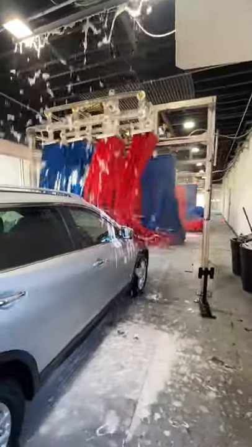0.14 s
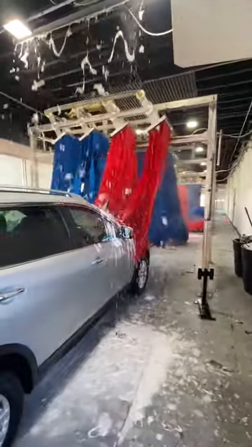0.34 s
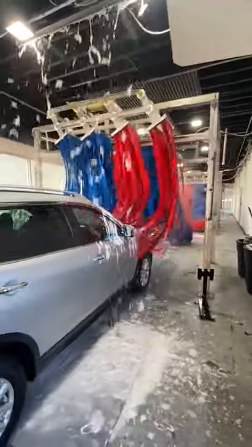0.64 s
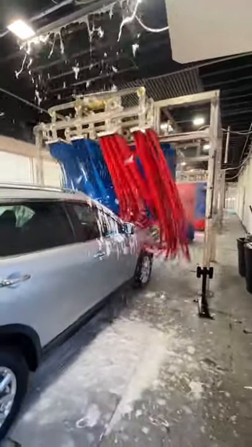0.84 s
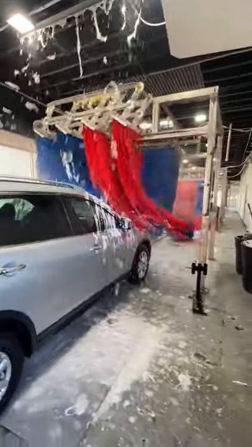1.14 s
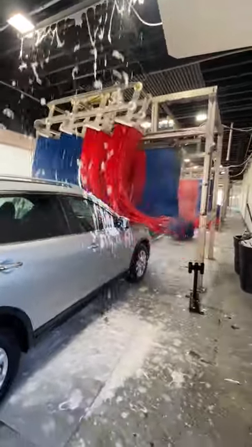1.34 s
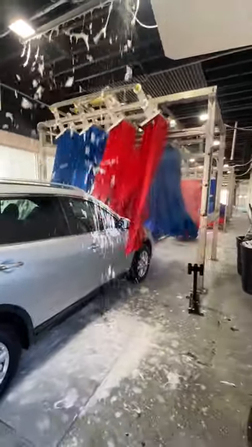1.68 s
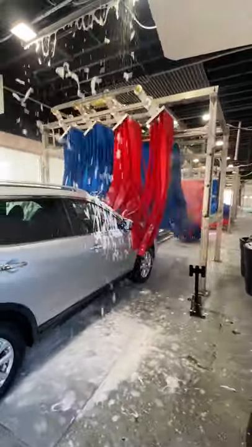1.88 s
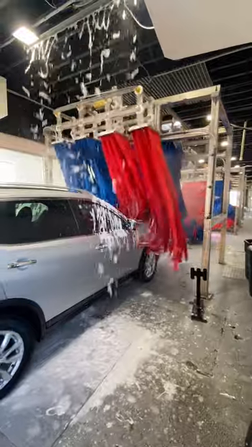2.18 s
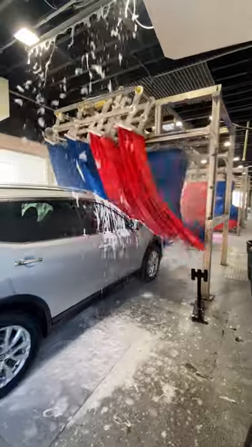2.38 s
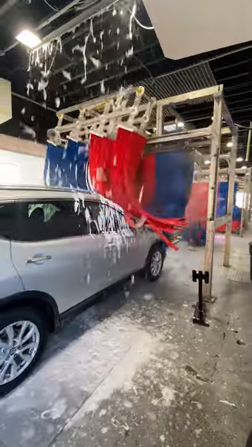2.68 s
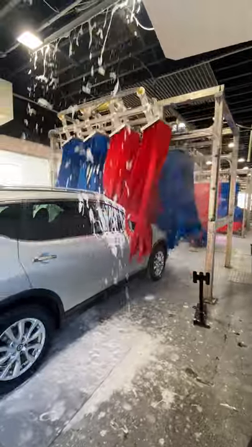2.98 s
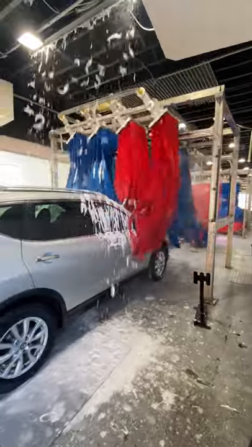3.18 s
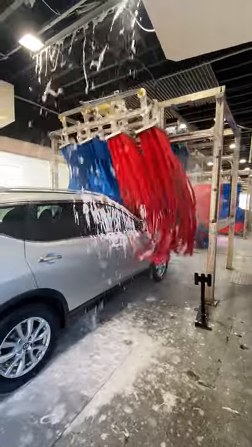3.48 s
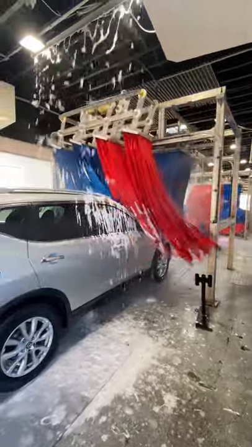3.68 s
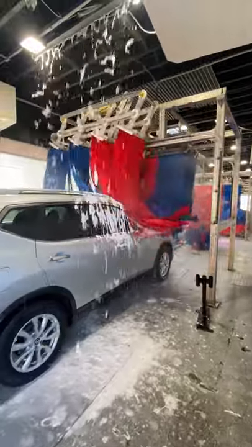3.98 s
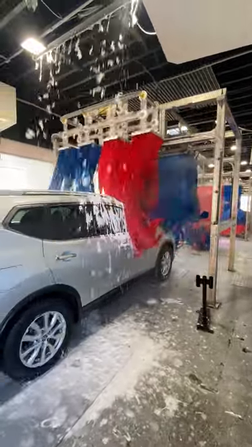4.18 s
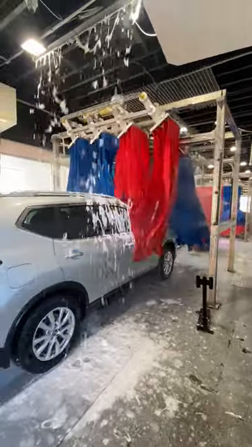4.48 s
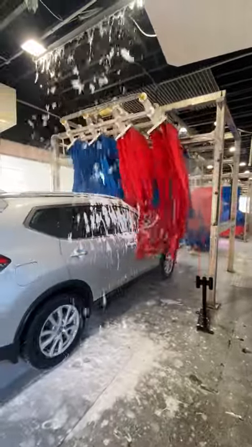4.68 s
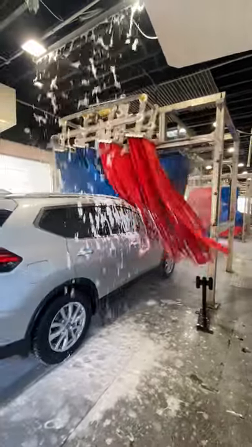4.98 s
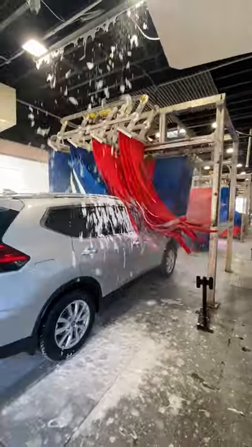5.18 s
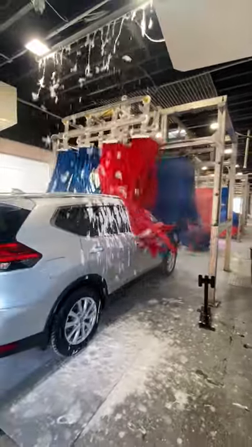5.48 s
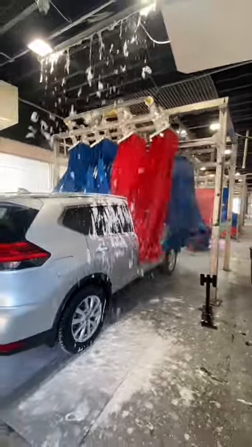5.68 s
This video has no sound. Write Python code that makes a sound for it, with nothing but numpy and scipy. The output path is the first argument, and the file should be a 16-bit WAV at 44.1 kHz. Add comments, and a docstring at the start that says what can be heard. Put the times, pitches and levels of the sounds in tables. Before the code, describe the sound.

Wet curtains rub continuously over a car, breaking into irregular slaps, some dull and some sharp, with soft hollow thumps underneath. Spray hisses strongly at the start, giving way to light showers and drips. Foam bursts crisply on the floor nearby. A low motor groan swells late over steady machine roar. A phone in the hard, long hall picks it up in stereo, with further taps more distant.

```python
"""Inside a tunnel car wash, beside a car: wet cloth swishes over the bodywork and slaps it, brushes drum.
Slaps ring as short resonances; swish, drumming and spray are crowds of tiny random impacts, filtered.
A jet of spray hisses close by at first. Blobs of foam drop from an overhead bar and burst on the concrete
as clicks and noise. A frame knocks once, and pumps and motors drone as filtered noise and wavering tones.
All is heard through the two ports of a phone, in a hard, long hall."""
import sys
import numpy as np
from scipy import signal
from scipy.fft import rfft, irfft
from scipy.io import wavfile
from scipy.ndimage import uniform_filter1d, map_coordinates

SR = 44100
rng = np.random.default_rng(int(sys.argv[2]) if len(sys.argv) > 2 else 0)


def store_wav(level_fs):
    """Save 16-bit WAV to argv[1]."""
    pcm = np.round(np.clip(np.atleast_2d(level_fs), -1, 1) * 32767)
    wavfile.write(sys.argv[1], SR, pcm.T.astype(np.int16))


N = 257103
TIME = np.arange(N) / SR  # seconds
FREQ = np.maximum(np.fft.rfftfreq(N, 1 / SR), 1)  # Hz

# How a soft and a sharp tip sound. Each row: snap relative to the thud in dB, centre of the snap in Hz,
# width of the thud as a share of its own centre.
SOFT_TIP, SHARP_TIP = (-18, 1730, 0.25), (2.3, 3920, 1.2)
# Cloth striking the car. Each row: start in seconds, peak of the thud in dB, centre of the thud in Hz,
# snap of the tip relative to the thud in dB, level of the flurry after it in dB, length of the flurry in seconds.
CLOTH_SLAPS = [(.105, -15.5, 1200, -14, -31, 0.025), (.187, -16, 920, -24, -32, 0.019),
               (.245, -14, 1500, -3, -23.5, .018), (.283, -19.5, 267, -20, -27.5, 0.037),
               (.856, -14.5, 1500, -10, -35, .008), (1.243, -18, 775, -13, -38, .015),
               (1.435, -24, 705, -22, -34, 0.011), (1.463, -20, 734, -18, -36, .02),
               (1.499, -18, 636, -18, -26, 0.028), (1.524, -12, 1350, -10, -29, .012),
               (1.53, -20, 590, -14, -28.5, 0.043), (1.61, -18, 1070, -12, -33, 0.02),
               (1.752, -22, 266, -22, -31.5, 0.026), (2.164, -18, 700, -11, -33, 0.016),
               (2.215, -23, 690, -20, -35, .02), (2.371, -15.5, 930, -22, -31, 0.013),
               (2.396, -21, 1360, -14, -29, .015), (2.4345, -20, 1570, -7, -27.5, 0.031),
               (2.537, -28, 900, -13, -38, .012), (2.588, -24, 1000, -10, -36, .012),
               (2.626, -20, 170, -26, -26, 0.022), (2.8, -16, 910, -13, -29, .016),
               (2.861, -14, 700, -7, -24.5, 0.0094), (2.874, -10.5, 1180, -7, -26, .018),
               (2.9465, -13, 905, 2, -27.5, 0.036), (3.312, -22, 645, -20, -41, 0.011),
               (3.5705, -14.5, 920, -8, -25.5, .007), (3.604, -16, 720, -9, -29, .012),
               (3.919, -20, 840, -20, -40, 0.0089), (3.931, -17, 148, -26, -25, 0.038),
               (4.18, -16.5, 900, -3, -30, .01), (4.216, -18, 500, -3, -30, 0.023),
               (4.24, -17.5, 228, -24, -31, 0.037), (4.298, -11.5, 1220, -3, -32, 0.011),
               (4.32, -19, 1290, -21, -31.5, 0.039), (4.49, -19, 1700, -12, -34, 0.041),
               (4.722, -14.5, 830, -24, -36, 0.0082), (4.756, -22, 930, -15, -35, .01),
               (4.784, -23, 1020, -21, -37, 0.023), (4.918, -26, 800, -21, -52, .01),
               (5.007, -22, 840, -12, -35, 0.014), (5.113, -15.5, 175, -26, -23, 0.062),
               (5.146, -19, 834, -16, -31, .045), (5.579, -13.5, 640, -9.5, -28.5, .03),
               (5.642, -17, 1130, -14, -31, .018), (5.714, -21, 760, -16, -30.5, 0.041)]


def slaps(snap_width, flurry_width, strip_rate):
    """The tip of a strip snaps on a damped panel, and its neighbours flap down after it in a flurry."""
    track, t = np.zeros(N), TIME[:SR // 5]
    tip_db, tip_hz, tip_width = np.transpose([SOFT_TIP, SHARP_TIP])
    tap = 1. * (t == 0)  # a single click sets the resonances ringing
    for start_s, db, thud_hz, snap_db, flurry_db, flurry_s in CLOTH_SLAPS:
        # a sharper snap sounds higher and shortens the thud
        snap_hz = np.interp(snap_db, tip_db, tip_hz)
        thud_width_hz = thud_hz * np.interp(snap_db, tip_db, tip_width)
        thud = resonate(tap, thud_hz, thud_width_hz)
        snap = resonate(tap, snap_hz, snap_width * snap_hz)
        blow = thud / abs(thud).max() + undb(snap_db) * snap / abs(snap).max()

        contacts = rattle(t, strip_rate) * np.exp(-(t / flurry_s) ** 3)
        flurry = resonate(contacts, thud_hz, flurry_width * thud_hz)
        flurry = flurry / np.sqrt(np.sum(flurry ** 2) / (flurry_s * SR))
        add(track, start_s, undb(db) * blow + undb(flurry_db) * flurry)
    return track + hall(track, wet_db=-10)


# Between strokes the cloth rubs on, harder once the car is well into the curtains.
RUB_EARLY_DB, RUB_DB, RUB_FROM_S, RUB_FULL_S = -32, -30, 1.3, 1.6
# The curtains swing to and fro, and rub hardest as they meet the car.
SWING_PERIOD_S, SWING_HITS_S, SWING_DB = 1.287, 0.16, 1
# The fade after a stroke lasts a fixed time plus a share of the stroke's length.
STROKE_ATTACK_S, STROKE_RELEASE_S, STROKE_RELEASE_SHARE = 0.0082, 0.028, 0.13
# The tone colour of the swish. Each row: frequency in Hz, relative strength in dB per Hz.
SWISH_SPECTRUM = [(100, -10), (350, -6.5), (700, 2.5), (1300, -1.5), (2200, -5.5), (3500, -11),
                  (5000, -12.5), (15500, -31.5)]
# A curtain drags over the car. Each row: start in seconds, length in seconds, level in dB before the
# overall swish level, brightness in dB (treble against the rest).
CURTAIN_STROKES = [(0, 0.047, -25.5, -2), (0.1, 0.09, -25.5, -2), (0.19, 0.06, -21.5, 0.5),
                   (0.246, 0.023, -21.5, -1), (0.282, 0.044, -24, -9), (1.443, 0.18, -26, 1),
                   (2.153, 0.069, -26, -2), (2.435, 0.023, -24.5, -3), (2.595, 0.038, -32.5, -4),
                   (2.864, 0.027, -20, 1.5), (2.946, 0.038, -23, 4), (3.328, .04, -29, 4),
                   (3.596, 0.049, -28, -3), (3.802, 0.02, -29, 0), (4.282, 0.16, -39, 9),
                   (5.155, 0.16, -36, -12), (5.4, 0.028, -27, 9), (5.56, 0.12, -33, 4)]


def cloth(swish_db, smear_db, flutter_db, split_hz):
    """Wet cloth drags over paint in countless small slips; heavy strokes rush dully, whipping ones crackle."""
    swing = SWING_DB * np.cos(2 * np.pi * (TIME - SWING_HITS_S) / SWING_PERIOD_S)
    rub = undb(curve([(RUB_FROM_S, RUB_EARLY_DB), (RUB_FULL_S, RUB_DB)]) + swing)

    def drag(tilt):
        """Loudness of rubbing and strokes, with a share of each stroke's brightness added."""
        strokes = 0
        for start_s, length_s, db, bright_db in CURTAIN_STROKES:
            release_s = STROKE_RELEASE_S + STROKE_RELEASE_SHARE * length_s
            strokes = strokes + swell(start_s, length_s, db + tilt * bright_db, STROKE_ATTACK_S, release_s)
        return np.sqrt(rub ** 2 + strokes)

    slips = grains(1800, spread_db=2.0) + undb(smear_db) * rng.standard_normal((2, N))
    swish = mottle(colour(slips, SWISH_SPECTRUM), depth_db=3.5, patch_s=.03, patch_hz=175.3)
    swish = level(swish, swish_db)
    rush = signal.sosfiltfilt(signal.butter(2, split_hz, fs=SR, output="sos"), swish)
    crackle = swish - rush
    return diffuse(rush * drag(-1 / 2) + crackle * drag(1 / 2)) * undb(flutter_db * walk(45))


BUMP_ATTACK_S, BUMP_HOLD_S, BUMP_RELEASE_S = 0.018, 0.035, 0.04
# The tone colour of the drumming. Each row: frequency in Hz, relative strength in dB per Hz.
DRUM_SPECTRUM = [(20, -34), (40, -19), (56, -5), (76, -1), (96, 2.5), (135, -0.5), (165, -3.5), (280, -7),
                 (410, -11), (520, -17), (900, -24.5), (3000, -75)]
# Resonances of the bodywork. Each row: centre in Hz, width in Hz, strength in dB relative to the others.
BODY_RESONANCES = [(59.6, 11, 5.5), (93, 17, 2.5), (113.1, 27, 4.5), (132, 22, 5)]
# How hard the brushes press on the car. Each row: time in seconds, pressure in dB; only the rise and fall
# about the average matters.
BRUSH_PRESSURE = [(0, -29.5), (.15, -29.5), (.35, -29.5), (1.15, -31), (1.45, -28.5), (2.2, -29.5),
                  (2.55, -25), (2.98, -25), (3.2, -30), (3.48, -26), (3.8, -27), (4.1, -25.5), (4.4, -28.5),
                  (5.83, -28)]
# A bunch of strips lands on a panel. Each row: start in seconds, level in dB.
STRIP_BUMPS = [(.04, -26.5), (.115, -26), (1.47, -22.5), (1.73, -28), (2.47, -23.5), (2.8, -31),
               (3.49, -30), (3.65, -24.5), (3.93, -29), (4.2, -24), (5.12, -19.5), (5.25, -26), (5.4, -28),
               (5.59, -29.5)]


def brushes(drum_db, drum_growth, thump_rate, boom_db, boom_growth):
    """Soft strips land one after another, now and then in a bunch; under pressure the hollow panels boom."""
    pressure = curve(BRUSH_PRESSURE) - np.mean(curve(BRUSH_PRESSURE))
    bunches = sum(swell(s, BUMP_HOLD_S, db, BUMP_ATTACK_S, BUMP_RELEASE_S) for s, db in STRIP_BUMPS)
    thumps = grains(thump_rate, spread_db=1.5)
    drumming = undb(drum_db + drum_growth * pressure)
    patter = level(colour(thumps, DRUM_SPECTRUM)) * np.sqrt(drumming ** 2 + bunches)
    rub = rng.standard_normal((2, N))
    boom = sum(undb(db) * resonate(rub, hz, width_hz) for hz, width_hz, db in BODY_RESONANCES)
    return diffuse(patter + level(boom, boom_db) * undb(boom_growth * pressure))


# Small blobs fall at random in the later part.
DRIPS_FROM_S, DRIP_DB, DRIP_SPREAD_DB, DRIP_BRIGHT_DB = 2.0, -29.5, 8, -8.5


def drips(count):
    """Small blobs at random moments, as rows of start in seconds, level in dB, brightness in dB."""
    rows = []
    for when, size in rng.random((count, 2)):
        start_s = DRIPS_FROM_S + when * (TIME[-1] - DRIPS_FROM_S)
        rows.append((start_s, DRIP_DB + DRIP_SPREAD_DB * (size - .5), DRIP_BRIGHT_DB))
    return rows


# The tone colour of the splats. Each row: frequency in Hz, relative strength in dB per Hz.
SPLAT_SPECTRUM = [(500, 7), (3000, -11), (5500, -6.5), (8500, 8.5), (15500, 0.5)]
# Big foam blobs landing close by. Each row: start in seconds, level in dB relative to the other blobs,
# brightness in dB (treble against the rest).
FOAM_SPLATS = [(.138, -17, 11), (0.424, -23, 5), (0.496, -31, 3), (0.531, -22, 11), (.561, -19, -4),
               (1.008, -38, 0), (1.062, -29, -5), (1.413, -18.5, -4), (1.535, -19.5, -1.5), (1.794, -13, 6),
               (1.9, -31, -4), (2.0343, -17, 0.5), (2.146, -28, 4), (2.185, -15.5, 6), (2.334, -26.5, -1),
               (2.491, -29, -4), (2.588, -27, 3), (2.655, -24.5, -1), (2.732, -26, -1), (3.062, -24, 3),
               (3.093, -23.5, -2), (3.185, -22, 12), (3.306, -29, 2), (3.405, -23, 3), (3.44, -17, 7),
               (3.488, -13, 10), (3.7813, -13, 2.5), (3.791, -22, -5), (3.802, -16.5, 3), (4, -24, 7),
               (4.02, -16, 8), (4.459, -19, 2), (4.644, -20, 0.5), (4.729, -23, -7), (4.845, -24, 2),
               (4.958, -24, -4), (5.032, -22.5, -5.5), (5.238, -29, -4), (5.397, -15, 3), (5.473, -23, -3),
               (5.5194, -21, -8), (5.804, -22, -5)]


def splats(splat_db, touch_db, burst_lag_s, burst_s, spatter_db, spatter_s):
    """A blob ticks as it touches, bursts a moment later and throws a spatter of droplets."""
    track, t = np.zeros(N), TIME[:SR // 5]
    after = np.maximum(t - burst_lag_s, 0)
    for start_s, db, bright_db in FOAM_SPLATS + drips(count=12):
        crack = rng.standard_normal(len(t))
        droplets = level(rng.standard_normal(len(t)) * rng.exponential(size=len(t)) ** 1.5)
        length_s = burst_s * undb(-.6 * bright_db)  # soft, dull blobs take longer to burst
        touch = undb(touch_db) * crack * np.exp(-t / length_s)
        spatter = undb(spatter_db - .5 * bright_db) * droplets * np.exp(-after / spatter_s)
        burst = crack * np.exp(-after / length_s) + spatter
        splat = touch + (t >= burst_lag_s) * burst

        low = signal.sosfiltfilt(signal.butter(3, 10500, fs=SR, output="sos"), splat)
        treble = splat - low
        splat = low * undb(-bright_db / 2) + treble * undb(bright_db / 2)
        add(track, start_s - burst_s / 2, undb(db + splat_db) * splat)
    track = colour(track, SPLAT_SPECTRUM)
    return track + hall(track, wet_db=-5.5)


# The jet runs, opens fully, then shuts and drains; levels are in dB before the overall spray level.
JET_DB, JET_FULL_DB = -29, -25.5
JET_OPENS_S, JET_SHUTS_S, JET_ATTACK_S, JET_DRAIN_S = 0.18, 0.32, 0.012, 0.28
SHOWER_ATTACK_S, SHOWER_HOLD_S, SHOWER_RELEASE_S, DRIZZLE_DB = 0.12, 0.034, 0.11, -43
# Water flung off the cloth showers down. Each row: start in seconds, level in dB before the spray level.
WATER_SHOWERS = [(1.03, -36), (1.92, -35), (2.201, -30.5), (2.67, -31), (2.88, -45), (3.1, -36.5),
                 (3.38, -34.5), (4.21, -37), (4.8, -33.5), (5.281, -37.5), (5.45, -38)]


def water_flow():
    """Strength of the falling water: the jet, showers off the cloth and a steady drizzle."""
    jet = swell(0, JET_SHUTS_S, JET_DB, JET_ATTACK_S, JET_DRAIN_S)
    full_jet = swell(JET_OPENS_S, JET_SHUTS_S - JET_OPENS_S, JET_FULL_DB, JET_ATTACK_S, JET_DRAIN_S)
    showers = sum(swell(s, SHOWER_HOLD_S, db, SHOWER_ATTACK_S, SHOWER_RELEASE_S) for s, db in WATER_SHOWERS)
    return np.sqrt(jet + full_jet + showers + undb(DRIZZLE_DB) ** 2)


# The tone colour of the spray. Each row: frequency in Hz, relative strength in dB per Hz.
SPRAY_SPECTRUM = [(500, -20), (1800, -8), (2600, -2), (3500, -4.5), (5000, -8), (7000, -2), (8300, 0),
                  (9200, 1.5), (9600, -6), (11500, -5), (13500, -9), (15500, -10)]


def spray(spray_db, mist_db, flutter_db):
    """Droplets patter on the car and floor; the stronger the jet, the more they fuse into hiss."""
    flow = water_flow()
    mist = undb(mist_db) * np.sqrt(flow / flow.max()) * rng.standard_normal((2, N))
    patter = grains(1100, spread_db=3.5)
    drops = level(mottle(patter, depth_db=2.0, patch_s=.025, patch_hz=400) + mist)
    return diffuse(colour(drops, SPRAY_SPECTRUM)) * flow * undb(spray_db + flutter_db * walk(70))


CLUNK_S = .5103
# What the curtain frame rings with. Each row: centre in Hz, width in Hz, strength in dB before it is
# divided by the width.
FRAME_MODES = [(1000, 980, 4.5), (1700, 440, -15), (290, 140, -10), (130, 80, -15.5)]


def clunk(clunk_db, rattle_db, rattle_s, contact_hz):
    """One blunt knock, probably from the swinging curtain frame, that rattles briefly."""
    track, t = np.zeros(N), TIME[:SR // 5]
    force = 1. * (t == 0) + undb(rattle_db) * rattle(t, 4000) * np.exp(-t / rattle_s)
    # a blunt contact passes little treble
    force = signal.sosfilt(signal.butter(4, contact_hz, fs=SR, output="sos"), force)
    ring = sum(undb(db) * resonate(force, hz, width_hz) / width_hz for hz, width_hz, db in FRAME_MODES)
    add(track, CLUNK_S, undb(clunk_db) * ring / abs(ring).max())
    return track + hall(track, wet_db=-10)


def flaps(flap_rate, flaps_db, cycles):
    """Single strips tap here and there further off, each a dying tone with its own pitch."""
    track, t = np.zeros(N), TIME[:SR // 20]
    for when, pitch, size in rng.random((int(flap_rate * N / SR), 3)):
        hz = 450 * 2 ** (2.3 * pitch)
        tap = np.sin(2 * np.pi * hz * t) * np.exp(-hz * t / cycles)
        add(track, when * N / SR, size ** 2 * undb(-4 * pitch) * tap)
    return level(track + hall(track, wet_db=11.0), flaps_db)


# Motor hum. Each row: frequency in Hz, level in dB.
MOTOR_HUM = [(57, -42), (121.5, -39), (219, -42.5), (297, -41.5), (392, -44)]
# The tone colour of the roar. Each row: frequency in Hz, relative strength in dB per Hz.
ROAR_SPECTRUM = [(20, -15), (40, 1), (58, -4), (120, 1), (280, 0), (470, -7), (900, -8), (1800, -14),
                 (4000, -18.5), (5200, -22), (8500, -24), (15500, -104)]
# A brush drive groans as it takes the load. Each row: time in seconds, level in dB.
DRIVE_GROAN = [(0, -43), (3.2, -44), (3.55, -35), (4.22, -30.5), (4.8, -38.5), (5.83, -53)]


def machinery(din_db, waver_db, hum_drift, drive_hz):
    """Pumps and blowers merge into a roar down the tunnel; motor tones waver in it."""
    def tone(hz):
        """A sine whose pitch and loudness wander."""
        phase = 2 * np.pi * np.cumsum(hz * (1 + hum_drift * walk(9))) / SR
        return level(np.sin(phase) * undb(1.9 * walk(4.3)))

    roar = level(colour(rng.standard_normal((2, N)), ROAR_SPECTRUM), din_db) * undb(waver_db * walk(5.31))
    hum = sum(undb(db) * tone(hz) for hz, db in MOTOR_HUM)
    groan = undb(curve(DRIVE_GROAN)) * tone(drive_hz)
    return diffuse(roar) + hum + groan


# Time for the echo to fall by 60 dB, for the lower range and for the treble.
HALL_T60_S, HALL_TREBLE_T60_S = 0.87, 0.12


def hall(x, wet_db):
    """Reverberation of the tunnel as dying noise; the treble dies first."""
    noise = rng.standard_normal((2, N))
    low = signal.sosfilt(signal.butter(2, 2500, fs=SR, output="sos"), noise)
    treble = noise - low
    tail = low * undb(-60 * TIME / HALL_T60_S) + treble * undb(-60 * TIME / HALL_TREBLE_T60_S)
    tail = tail * np.minimum(TIME / 0.00097, 1)  # a very short rise
    tail = tail / np.sqrt(np.sum(tail ** 2) / 2)
    return undb(wet_db) * diffuse(signal.fftconvolve(x[None], tail, axes=1)[:, :N])


def undb(db):
    """Decibels to gain."""
    return 10 ** (np.asarray(db) / 20)


def level(x, db=0):
    """Scale a sound to an rms level in dB."""
    return x * undb(db) / np.sqrt(np.mean(x ** 2))


def curve(rows):
    """Join rows of time in seconds and value by straight lines."""
    return np.interp(TIME, *np.transpose(rows))


def by_frequency(rows, axis=1):
    """One column of a table, spread over a log-frequency axis."""
    rows = np.array(rows)
    return np.interp(np.log(FREQ), np.log(rows[:, 0]), rows[:, axis])


def colour(x, points):
    """Filter by a spectrum in Hz and dB that keeps the power of white noise."""
    return irfft(rfft(x) * level(undb(by_frequency(points))), N)


def walk(rate):
    """Slow chance: random levels held 1 / rate seconds and smoothed twice; spread near 1."""
    hold = int(SR / rate)
    steps = np.repeat(rng.standard_normal(N // hold + 1), hold)
    return 1.325 * uniform_filter1d(uniform_filter1d(steps, hold), hold)[:N]


def add(track, start_s, sound):
    """Mix a short sound into a track at a time."""
    i = max(int(start_s * SR), 0)
    track[i:i + len(sound)] += sound[:N - i]


def grains(rate, spread_db):
    """Two unrelated streams of tiny impacts, rate per second, a few much bigger than the rest."""
    size = undb(spread_db * np.minimum(rng.exponential(size=(2, N)), 4))
    hits = rng.random((2, N)) < rate / SR
    return level(hits * size * rng.choice([-1, 1], (2, N)))


def rattle(t, rate):
    """A quick, uneven run of small contacts over a little rubbing."""
    contacts = rng.random(len(t)) < rate / SR
    return level(rng.standard_normal(len(t)) * (contacts + .03)) * np.minimum(t / .002, 1)


def resonate(x, hz, width_hz):
    """A resonance with gain 1 at its centre, applied twice for steep skirts; the width is of one pass."""
    b, a = signal.iirpeak(hz, hz / width_hz, fs=SR)
    return signal.lfilter(b, a, signal.lfilter(b, a, x))


def mottle(x, depth_db, patch_s, patch_hz):
    """Every strip or droplet cluster has a colour of its own: short random swells in narrow bands."""
    hz, s, bands = signal.stft(x, SR, nperseg=512)
    place = np.meshgrid(hz / patch_hz, s / patch_s, indexing="ij")
    patches = map_coordinates(rng.standard_normal((200, 600)), place, order=1, mode="wrap")
    return signal.istft(bands * undb(depth_db * patches), SR)[1][..., :N]


def swell(start_s, hold_s, db, attack_s, release_s):
    """Power of a sound that rises, holds and dies away."""
    early, late = np.maximum(start_s - TIME, 0), np.maximum(TIME - start_s - hold_s, 0)
    return (undb(db) * np.exp(-early / attack_s - late / release_s)) ** 2


def scene():
    """All the sources of the wash together."""
    return (slaps(snap_width=0.28, flurry_width=1.07, strip_rate=900)
            + cloth(swish_db=-2.46, smear_db=2, flutter_db=1.71, split_hz=2100)
            + brushes(drum_db=-28, drum_growth=1.07, thump_rate=450, boom_db=-35.5, boom_growth=1.9)
            + splats(splat_db=7.0, touch_db=-6, burst_lag_s=.003, burst_s=.0009,
                     spatter_db=-18, spatter_s=.016)
            + spray(spray_db=-2.5, mist_db=5.5, flutter_db=2.5)
            + clunk(clunk_db=-5.5, rattle_db=-28, rattle_s=.017, contact_hz=2000)
            + flaps(flap_rate=28, flaps_db=-38.5, cycles=3.5)
            + machinery(din_db=-28.5, waver_db=1.0, hum_drift=0.00718, drive_hz=169.5))


TOP_HZ = 15900
# The phone's two ports, used by the next two functions. Each row: frequency in Hz, likeness of left and
# right from 0 to 1, lead of the left in radians, left minus right in dB.
PHONE_PORTS = [(30, .88, 0, 0), (65, .84, -.15, 1), (130, 0.96, 0, 3), (300, 0.98, -0.12, 4.5),
               (550, 0.63, -1, 2.5), (760, 0.47, -0.77, 3.5), (1000, 0.23, 0, .5), (1800, 1, 0.92, -0.5),
               (2720, 0.65, 0.91, -4), (3930, .57, 1.05, -2.5), (4950, 0.6, 2.5, -2),
               (5800, 0.64, 0.84, -4), (8500, 1, 2.5, 3), (9300, .98, 3.1, .3), (10900, .99, 3.17, 0),
               (11900, 1, 4, 0.5), (15500, .7, 5, 0)]


def diffuse(pair):
    """Two unrelated sounds become a field from all round, partly alike at the two ports."""
    alike = np.clip(by_frequency(PHONE_PORTS, axis=1), 0, .99)
    mid, side = rfft(pair) * np.sqrt([(1 + alike) / 2, (1 - alike) / 2])
    return irfft([mid + side, mid - side], N)


def record(dry):
    """The two ports differ in phase and level along the spectrum; the top is cut steeply."""
    lead, tilt_db = by_frequency(PHONE_PORTS, axis=2), by_frequency(PHONE_PORTS, axis=3)
    left, right = undb(tilt_db / 2), undb(-tilt_db / 2) * np.exp(-1j * lead)
    ports = irfft(rfft(dry) * np.array([left, right]), N)
    return signal.sosfilt(signal.ellip(10, .2, 80, TOP_HZ, fs=SR, output="sos"), ports)


dry = scene()
out = record(dry)
store_wav(out)
```